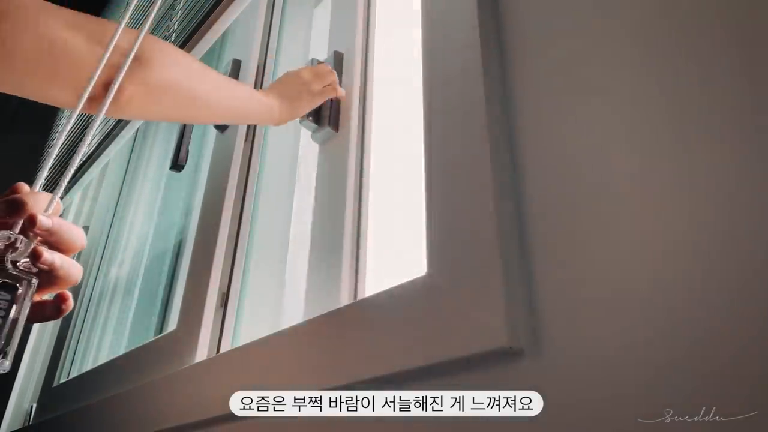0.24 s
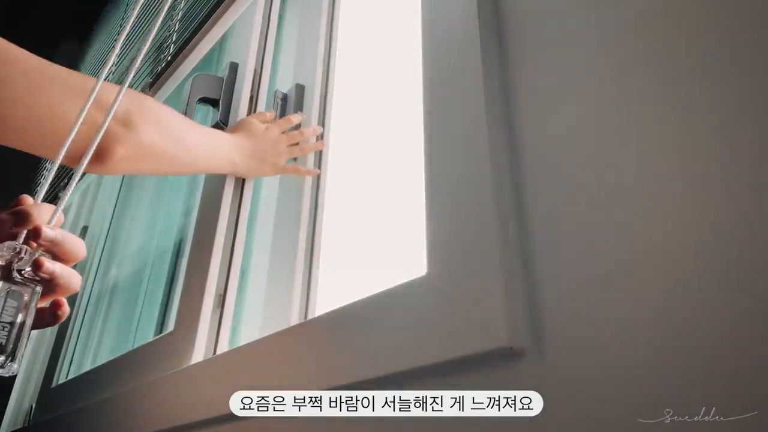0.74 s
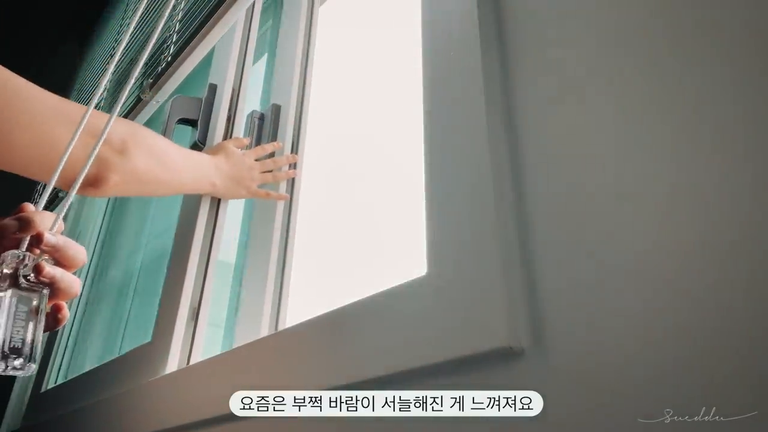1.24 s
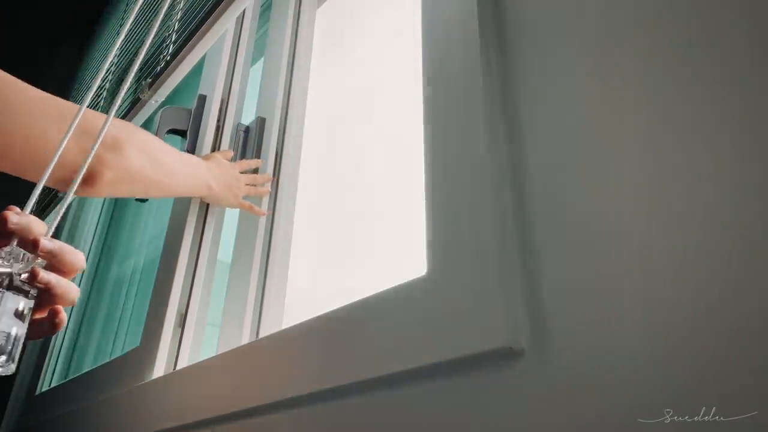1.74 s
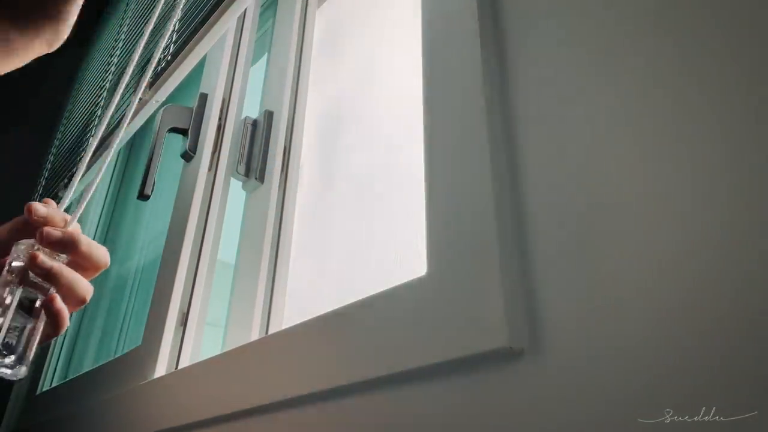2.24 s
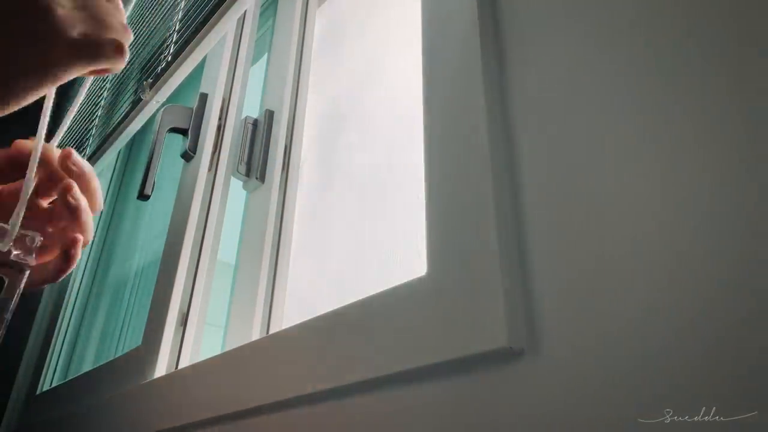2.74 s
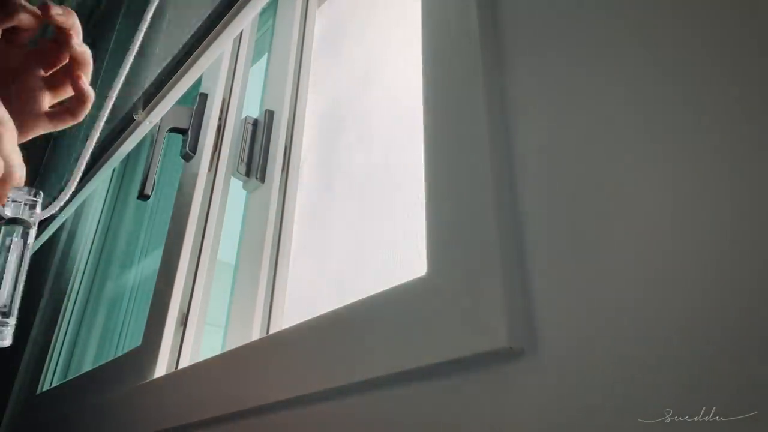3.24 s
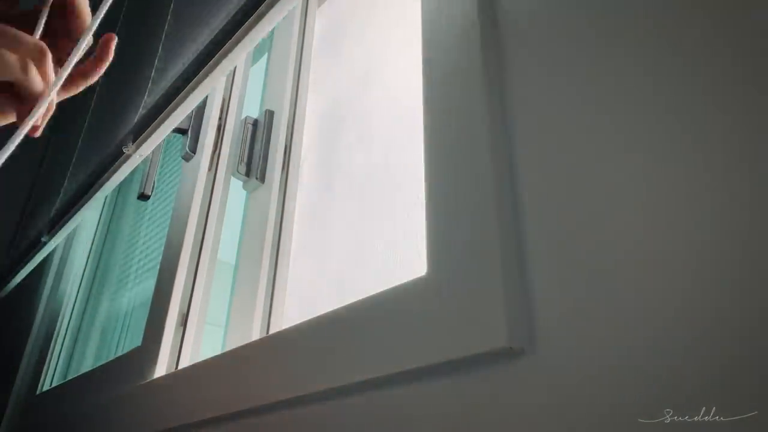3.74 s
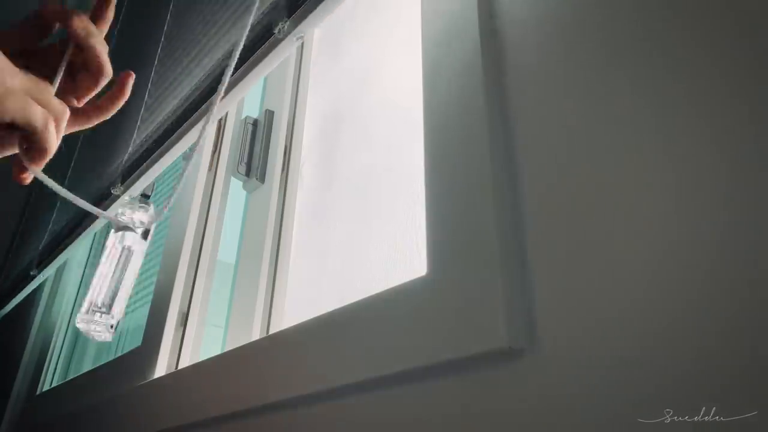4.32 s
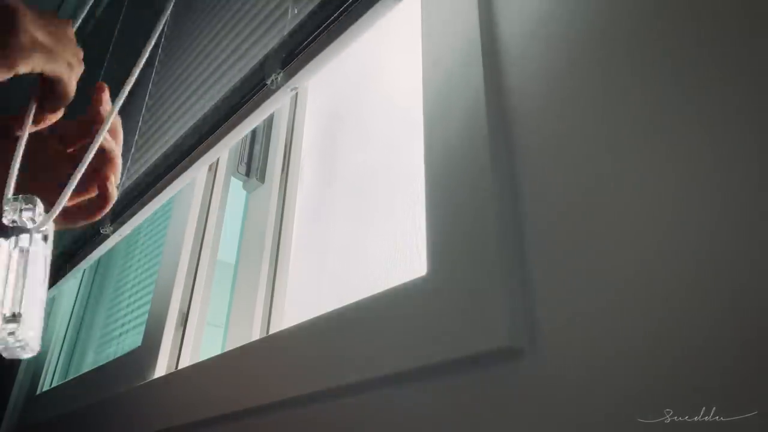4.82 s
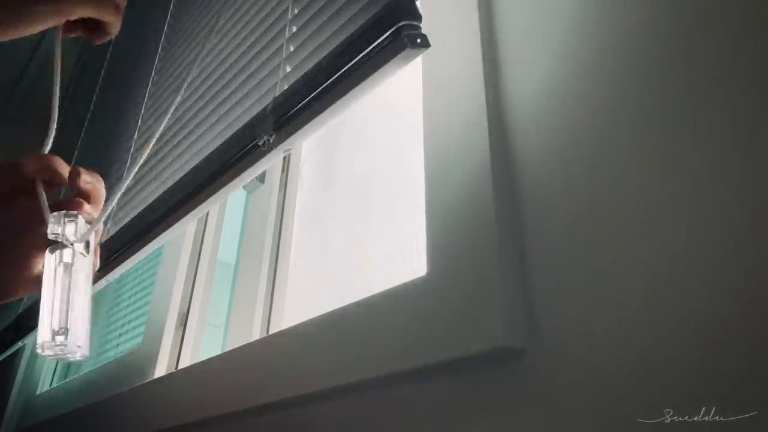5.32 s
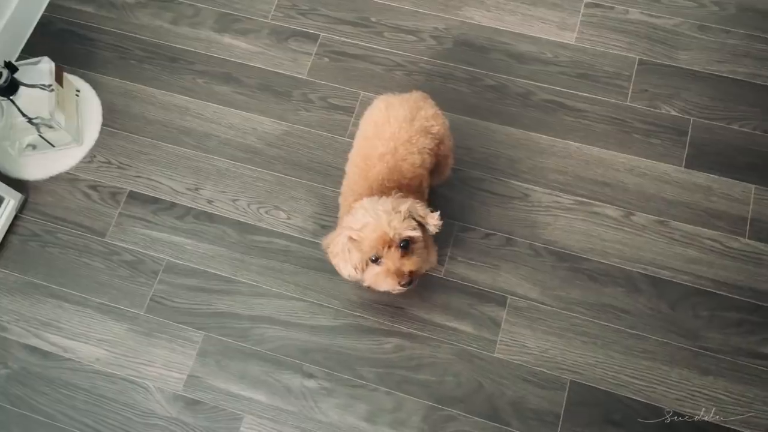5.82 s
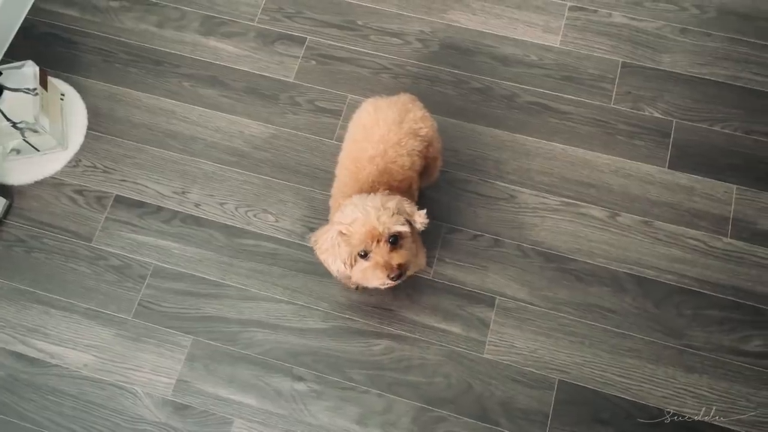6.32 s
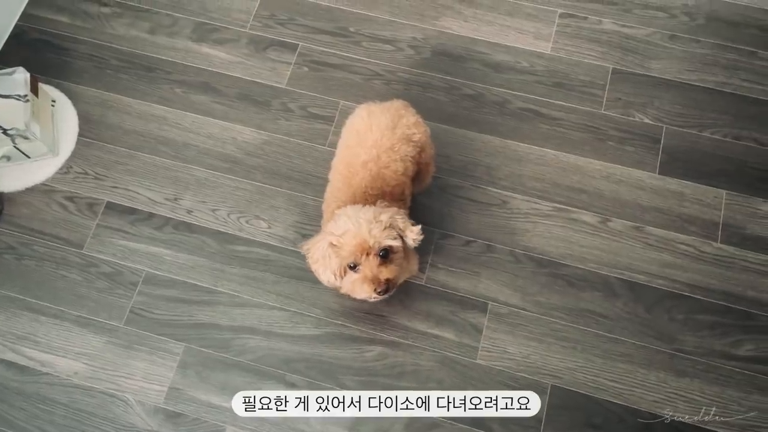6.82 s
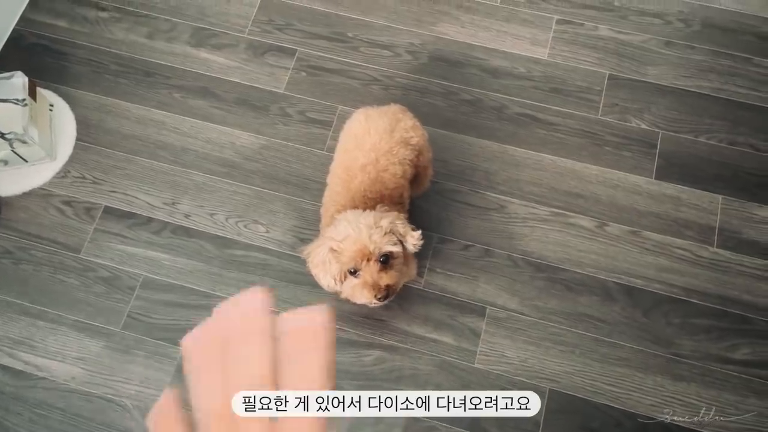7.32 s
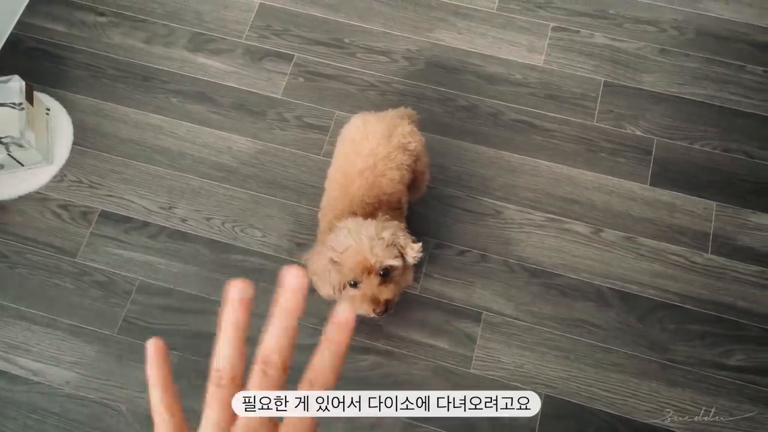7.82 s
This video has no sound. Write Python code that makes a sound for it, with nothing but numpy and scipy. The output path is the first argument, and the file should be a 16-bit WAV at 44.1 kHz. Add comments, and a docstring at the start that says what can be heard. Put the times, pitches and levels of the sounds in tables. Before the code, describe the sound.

Low street hum, a sliding window latching hard, repeated cord pulls rattling a slatted blind, then near-silence with soft rustle and tiny ticks.

```python
"""By a window over a street, a hand slides the sash along its track; the latch snaps and the frame thuds.
A slatted blind is then pulled repeatedly by its cord: cord hiss and gear rattle over a booming head rail.
A cut follows to a quiet room with a soft rustle and faint ticks. Friction is shaped random stick-slip,
impacts are noise cracks ringing resonances, and the air is drifting noise.
Two microphone ports hear the near sounds a little apart in phase."""
import sys
import numpy as np
from scipy import signal
from scipy.fft import rfft, irfft, next_fast_len
from scipy.io import wavfile
from scipy.ndimage import uniform_filter1d

SR = 44100
rng = np.random.default_rng(int(sys.argv[2]) if len(sys.argv) > 2 else 0)


def log_audio(samples):
    """Write samples as a 16-bit WAV file to the path given in sys.argv[1]."""
    # one column per channel
    frames = np.atleast_2d(samples).T
    # limit to full scale, then quantise
    limited = np.clip(frames, -1, 1)
    pcm = np.round(limited * 32767).astype(np.int16)
    wavfile.write(sys.argv[1], SR, pcm)


N = 355874

CUT_S, HANDOVER_S = 5.757, 2.58  # cut to the quiet room; the hand leaves the sash for the cord
CLOCK_S = np.arange(N) / SR
SIZE = next_fast_len(N + SR)  # leaves space for the reflections
HZ = np.fft.rfftfreq(SIZE, 1 / SR)


def amp(db):
    """Turn dB into a linear gain."""
    return 10 ** (np.asarray(db) / 20)


def evened(x):
    """Bring a sound to an RMS of one."""
    return x / np.sqrt(np.mean(x ** 2) + 1e-20)


def read(points, hz):
    """Read a curve along a logarithmic frequency axis."""
    f, value = np.transpose(points)
    return np.interp(np.log(hz + 1), np.log(f + 1), value)


def levels(rows):
    """Gains over time from the dB columns of a curve."""
    s, *columns = np.transpose(rows)
    return [amp(np.interp(CLOCK_S, s, column)) for column in columns]


def bumps(modes, hz):
    """Resonant peaks in dB over a flat response."""
    return sum(db / (1 + (2 * (hz - f) / width) ** 2) for f, width, db in modes)


def causal(db):
    """Minimum-phase impulse response for a dB gain given on an FFT grid."""
    log_gain = np.log(amp(np.maximum(db, -100)))
    full = np.concatenate([log_gain, log_gain[-2:0:-1]])
    return np.fft.ifft(np.exp(np.conj(signal.hilbert(full)))).real


def colour(x, points, modes=()):
    """Filter a sound through a spectrum and resonances, then even its level."""
    hz = np.fft.rfftfreq(16384, 1 / SR)
    response = causal(read(points, hz) + bumps(modes, hz))[:8192]
    return evened(signal.oaconvolve(x, response)[:N])


def slips(per_s, spread_db):
    """Stick-slip: random clicks of either sign, a few of them large."""
    chance = rng.random(N)
    size = rng.exponential(1, N)
    sign = rng.choice([-1, 1], N)
    return (chance < per_s / SR) * sign * amp(spread_db * np.minimum(size, 4))


def judder(hz, depth_db):
    """A gain that wobbles at random below a given rate, as under an uneven grip."""
    lowpass = signal.butter(2, hz, fs=SR, output="sos")
    wobble = signal.sosfilt(lowpass, rng.standard_normal(N))
    return amp(depth_db * evened(wobble))


def add(mix, s, sound):
    """Lay a sound into the mix at a time in seconds."""
    part = mix[round(s * SR):][:len(sound)]
    part += sound[:len(part)]


def air(points, same, phase, patchy_db):
    """Background noise with drifting patches, partly alike at both ports."""
    frames, hz = N // 512 + 5, np.fft.rfftfreq(2048, 1 / SR)
    a, b, c, d, patches = rng.standard_normal((frames, 1025, 5)).T
    patches = uniform_filter1d(patches, size=12, axis=0)  # across frequency
    patches = evened(uniform_filter1d(patches, size=6, axis=1))  # across time
    like = np.clip(read(same, hz), -1, 1)[:, None]
    lag = np.exp(-1j * read(phase, hz))[:, None]
    left = a + 1j * b
    right = like * lag * left + np.sqrt(1 - like ** 2) * (c + 1j * d)
    gain = amp(read(points, hz)[:, None] + patchy_db * patches)
    return evened(signal.istft(np.array([left, right]) * gain, nperseg=2048, noverlap=1536)[1][:, :N])


# Port spacing by the window: (frequency [Hz], left lead [rad])
PORT_PHASE = [(200, 0), (900, -.8), (1720, .3), (4900, 1.6), (5860, 3.6), (8350, 6.2), (9000, 6.36),
              (11300, 9.33), (12850, 9.52), (14600, 12.5), (16000, 12.6)]
# Port balance: (frequency [Hz], left minus right [dB])
PORT_BALANCE = [(110, 1.5), (500, -3), (1300, -1), (6500, -3), (8300, 0)]
# Reflections against direct sound, before each source's offset: (frequency [Hz], level [dB])
WET = [(130, -23), (350, 6.5), (4500, -1), (6500, 5.5), (8300, -26.5), (10000, 14), (11500, -15.5),
       (12700, -38), (13600, -15), (14800, -19)]
# Room decay: (frequency [Hz], time to fall 60 dB [s])
ROOM_T60 = [(200, 0.21), (1000, 0.22), (4000, 0.23), (12000, 0.083)]
NEAR_T60_S, LATE_DB = 0.045, -5.5  # reflections off sill and glass die first; the room follows


def ports(x, phase, wet_db=0):
    """Direct sound with the phase and balance of the port pair, plus reflections that differ per side."""
    hz, t, noise = signal.stft(rng.standard_normal((6, 2, SR // 2)), SR, nperseg=128)
    decay = amp(-60 * t / NEAR_T60_S) + amp(LATE_DB - 60 * t / read(ROOM_T60, hz)[:, None])
    tails = signal.istft(noise * decay, SR, nperseg=128)[1]
    tails = np.pad(tails, ((0, 0), (0, 0), (80, 0)))  # predelay in samples
    tails /= np.linalg.norm(tails, axis=2, keepdims=True)
    # the source moves, so the reflection pattern drifts among six
    rates_hz = np.repeat([[2.3], [3.7], [5.9]], 2, 0)
    turn = 2 * np.pi * CLOCK_S * rates_hz + np.pi / 2 * np.arange(6)[:, None]
    weights = np.cos(turn) / np.sqrt(3)
    echo = sum(rfft(x * weight, SIZE) * rfft(tail, SIZE) for weight, tail in zip(weights, tails))
    half = amp(read(PORT_BALANCE, HZ) / 2) * np.exp(.5j * read(phase, HZ))
    direct = np.array([half, 1 / half]) * rfft(x, SIZE)
    wet = amp(read(WET, HZ) + wet_db)
    return irfft((direct + wet * echo) / np.sqrt(1 + wet ** 2), SIZE)[:, :N]


# Street tone through the window, relative: (frequency [Hz], density [dB per Hz])
STREET = [(35, -1), (50, 0), (90, 2.5), (175, -12), (295, -18), (360, -21), (1040, -26), (2760, -41.5),
          (8800, -52), (16000, -73)]
# Stereo likeness of the street: (frequency [Hz], left-right likeness [0-1])
STREET_SAME = [(150, 0.96), (500, 0.36), (5500, 0.095), (8300, 0.39)]


def street():
    """Street noise through the window, low and broad, a touch louder on the left."""
    left_right_db = [[-47.2], [-48.2]]
    return amp(left_right_db) * air(STREET, STREET_SAME, PORT_PHASE, patchy_db=1.0)


# Sash moves before and after the latch: (time [s], rumble level [dB], hiss level [dB])
SLIDE = [(0.0, -38, -65.5), (0.31, -45.5, -69), (0.42, -51, -68), (0.65, -48.5, -62.5),
         (1.03, -49.5, -63.5), (1.21, -56.5, -66), (1.86, -49, -67), (2.2, -56, -70.5), (2.4, -56, -99)]
# Track rumble tone, relative: (frequency [Hz], density [dB per Hz])
SASH = [(60, -5), (140, -6), (290, -1.5), (500, -14), (1020, -20.5), (3000, -53.5), (9000, -82.5)]
# Brush seal tone, relative: (frequency [Hz], density [dB per Hz])
SEAL = [(800, -17), (1500, -1.5), (3100, -5.5), (5800, -12), (9000, -10), (16000, -20.5)]
# Rings of head rail and wall; the lowest five also colour the sash: (frequency [Hz], width [Hz], boost [dB])
RAIL = [(90, 16, 6), (196, 16, 6), (254, 16, 4), (336, 16, 5), (465, 25, 6), (592, 20, 5), (826, 50, 4),
        (1060, 35, 5), (1550, 50, 4)]


def sash():
    """Rollers rumble in the track while the brush seal hisses, both as stick-slip clicks."""
    rumble, hiss = levels(SLIDE)
    rollers = colour(slips(900, 3.34), SASH, RAIL[:5])
    brush = evened(judder(48, 1.0) * colour(slips(9000, 1.1), SEAL))
    return rumble * rollers + hiss * brush


CRACK_RISE_S, CRACK_RISE_CYCLES = 0.0014, .8  # low knocks swell more slowly
BLOW = 0.48  # the single sharp contact inside each crack, beside its grit


def cracks(rows, modes):
    """Short noise cracks, each ringing the modes of the thing that is struck."""
    out, t, hz = np.zeros(N), np.arange(8192) / SR, np.fft.rfftfreq(8192, 1 / SR)
    for s, db, centre_hz, spread, t60 in rows:
        rise = 1 - np.exp(-t / (CRACK_RISE_S + CRACK_RISE_CYCLES / centre_hz))
        crack = rng.standard_normal(len(t)) * amp(-60 * t / max(t60, .005)) * rise
        crack[round(CRACK_RISE_S * SR)] += BLOW * np.linalg.norm(crack)
        octaves = np.log2(np.maximum(hz, 20) / centre_hz)
        ring = causal(bumps(modes, hz) - 6 * (octaves / spread) ** 2)
        knock = signal.fftconvolve(crack, ring[:2048])[:len(t)]
        add(out, s, amp(db) * knock / abs(knock).max())
    return out


# Latch and sash knocks: (time [s], peak level [dB], centre [Hz], spread [octaves], time to fall 60 dB [s])
KNOCKS = [(0.615, -60, 2480, 1.2, 0.034), (.626, -43.5, 1860, 0.46, 0.08), (.640, -38.5, 1900, 0.68, 0.061),
          (0.697, -50, 1540, 0.61, 0.054), (1.673, -49, 2520, 1.2, 0.021),
          (1.6855, -36.5, 2540, 0.66, 0.0093), (1.708, -36, 607, 0.93, 0.18),
          (1.706, -45, 3100, 0.57, 0.0095), (1.716, -31.5, 1800, 0.93, 0.09),
          (1.7205, -30, 2500, 1.8, 0.061), (1.7262, -16.5, 3500, 1.08, 0.011),
          (1.735, -23.5, 600, 0.9, 0.24), (1.7395, -20.5, 1150, 0.87, 0.016), (1.768, -26, 398, 0.7, 0.06)]
# Latch rings: (frequency [Hz], width [Hz], boost [dB])
LATCH = [(1380, 83, 6), (1660, 320, 2.5), (3150, 400, 9.5), (4800, 450, 8), (9150, 310, -0.5)]


def latch_knocks():
    """Latch and sash crack against each other, ringing the latch metal."""
    return cracks(KNOCKS, LATCH)


# Frame modes: (frequency [Hz], width [Hz], level before the onset fade [dB])
FRAME = [(62.6, 6.1, -33), (98, 6.1, -26.5), (170, 44, -13), (195.4, 8.5, -30), (289, 30, -23),
         (450, 16, -31.5)]


def frame_thud():
    """The frame answers the closing blow with a slower thud of decaying sines."""
    out, t = np.zeros(N), np.arange(SR // 2) / SR
    thud = 0
    for db, width, f in [(db, width, f) for f, width, db in FRAME]:
        thud = thud + amp(db) * np.exp(-np.pi * width * t) * np.sin(2 * np.pi * (f * t + rng.random()))
    add(out, 1.735, thud * (1 - np.exp(-t / .01)))  # the sash meets the frame
    return out


# Pulls on the cord, hand over hand; levels are before swell and sag: (full speed before lag [s], hold [s],
# swell before each layer's share [dB], start briskness [factor], stop briskness [factor],
# rail boom level [dB], gear rattle level [dB], cord hiss level [dB], rail hum level [dB])
PULLS = [(2.798, 0.21, -1.5, 0.78, 1.4, -40, -46, -56, -38),
         (3.114, 0.0061, -3.5, 0.98, 2, -47, -61, -68.5, -59),
         (3.336, .12, -2.5, 0.87, 1.2, -45, -47, -55, -46.5),
         (3.665, 0.12, 3, 0.74, 0.59, -40, -38.5, -49.5, -39.5),
         (3.9, 0.14, 6.5, 0.71, 0.83, -40, -40, -50, -54),
         (4.22, 0.18, 9, 0.99, 0.87, -34.5, -34.5, -47, -39),
         (4.501, 0.18, 1.5, 0.53, 0.66, -40.5, -45.5, -54.5, -40.5),
         (4.83, 0.11, 8, 0.53, 0.34, -36, -37.5, -48, -41.5),
         (5.12, 0.14, 7, 0.32, 0.73, -42.5, -44, -52.5, -46),
         (5.429, 0.11, 6.5, 0.74, 0.27, -39.5, -38.5, -48.5, -42.5),
         (5.71, 0.076, 7.5, 0.51, .9, -42.5, -46.5, -53.5, -55)]
# how each layer answers a pull, in the order boom, rattle, hiss, hum
RISE_DB_PER_S, FALL_DB_PER_S = (149, 131, 133, 160), (107, 150, 144, 120)  # before briskness and steepening
SWELL_SHARE = (0.48, 1, 1.0, 0.18)  # part of the swell taken
ARCH_DB = (1.5, 2.35, 0.93, 7.4)  # sag towards both ends of the hold
REST_DB = (-54, -64, -99, -56.5)  # the blind still sways between pulls
LAG_S = (0.02, 0.0046, 0.001, 0.039)  # rail and gears take up the pull after the cord
STEEPEN_S = 0.1  # the further from the hold, the faster the sound drops away


def pulled(layer):
    """Gain of one layer: each pull rises, holds with a swell, and falls; their powers add."""
    t = np.arange(0, N / SR, .001)
    power = amp(REST_DB[layer]) ** 2
    for s, held, swell_db, start, stop, *top_db in PULLS:
        s = s + min(LAG_S[layer], held / 2)
        u = np.clip((t - s) / held, 0, 1)  # progress through the hold
        db = top_db[layer] - SWELL_SHARE[layer] * swell_db * (1 - u) - ARCH_DB[layer] * (2 * u - 1) ** 2
        early, late = np.maximum(s - t, 0), np.maximum(t - s - held, 0)
        db = db - start * RISE_DB_PER_S[layer] * early * (1 + early / STEEPEN_S)
        db = db - stop * FALL_DB_PER_S[layer] * late * (1 + late / STEEPEN_S)
        power = power + amp(db) ** 2
    return np.interp(CLOCK_S, t, np.sqrt(power))


# Rail boom tone, relative: (frequency [Hz], density [dB per Hz])
BOOM = [(40, 0), (100, -2.5), (150, 2.5), (300, 1.5), (500, -15.5), (3000, -80.5)]
# Gear rattle tone, relative: (frequency [Hz], density [dB per Hz])
RATTLE = [(200, -24.5), (420, -2.5), (800, -9.5), (1000, -12), (2050, -14.5), (2350, -33.5), (6000, -74)]
# Cord hiss tone, relative: (frequency [Hz], density [dB per Hz])
CORD = [(1200, -23), (2400, -4), (6000, -8.5), (9000, -6.5), (16000, -14)]
HUM_HZ, HUM_WANDER_DB = 196, 0.4  # pitch of one rail ring; its random stray as a frequency ratio in dB


def blind():
    """The cord slips over its pulley, gears rattle, the head rail booms and hums."""
    boom, rattle, hiss, hum = map(pulled, range(4))
    grip = evened(judder(37.6, 0.97))  # shared by rattle and hiss
    pitch_hz = HUM_HZ * judder(44.0, HUM_WANDER_DB)
    tone = np.sin(2 * np.pi * np.cumsum(pitch_hz) / SR) * evened(judder(3.2, 0.57))
    rail = colour(slips(1000, 3.0), BOOM, RAIL)
    gears = colour(slips(1100, 2.55), RATTLE, RAIL)
    cord = colour(slips(12000, 0.81), CORD)
    return boom * rail + hum * evened(tone) + rattle * grip * gears + hiss * grip * cord


SLATS_DB = -5.5  # slat taps beside the gear rattle
SLAT_LOW_HZ, SLAT_HIGH_HZ, SLAT_CYCLES = 408.8, 2133, 12  # range of pitches, length of ring


def slat_taps(count=20):
    """Slats tap each other as the gears rattle, each with a short ring of its own pitch."""
    taps, which, out = slips(220, 2.55), rng.integers(0, count, N), np.zeros(N)
    for k, hz in enumerate(np.geomspace(SLAT_LOW_HZ, SLAT_HIGH_HZ, count)):
        turns = np.arange(2048) * hz / SR
        ring = turns * np.exp(-4 * turns / SLAT_CYCLES) * np.sin(2 * np.pi * turns)
        out += signal.oaconvolve(taps * (which == k), ring / np.sqrt(hz))[:N]
    return amp(SLATS_DB) * pulled(1) * (CLOCK_S > HANDOVER_S) * evened(out)


# The blind catches and clacks: (time [s], peak level [dB], centre [Hz], spread [octaves],
# time to fall 60 dB [s])
CLACKS = [(2.674, -54, 980, 0.54, 0.019), (2.806, -26.5, 980, 1.05, 0.054), (2.823, -28, 302, 1.34, 0.17),
          (3.68, -29.5, 870, 0.79, 0.34), (3.91, -39, 2550, 0.84, 0.037), (3.995, -40, 4770, 0.32, .08),
          (4.316, -27.5, 820, 0.2, 0.016), (4.43, -34, 1550, 0.33, 0.03), (4.848, -38.5, 885, 0.92, 0.1),
          (5.099, -38, 7500, 1.1, 0.0084), (5.1, -48.5, 3120, .2, 0.02), (5.607, -26.5, 8400, 0.77, 0.018),
          (5.608, -38, 4950, 0.15, .03)]
# Plastic grip on the cord: (frequency [Hz], width [Hz], boost [dB])
GRIP = [(3120, 61, 9), (4950, 65, 9)]


def blind_clacks():
    """The blind catches and clacks, ringing the head rail and the cord's grip."""
    return cracks(CLACKS, RAIL + GRIP)


# Quiet room tone, relative: (frequency [Hz], density [dB per Hz])
QUIET = [(35, -4.5), (55, -2), (80, -16.5), (250, -17), (770, -36), (2600, -54), (4000, -52), (4900, -44.5),
         (5500, -49), (7000, -46), (8500, -59.5), (11500, -68)]
# Stereo likeness of the quiet room: (frequency [Hz], left-right likeness [0-1])
QUIET_SAME = [(150, 0.86), (500, 0.26), (3500, 0.071), (5000, 0.44), (7500, 0.9)]
# Port spacing in the quiet room: (frequency [Hz], left lead [rad])
QUIET_PHASE = [(5000, 0), (7300, -3.14), (8600, -4.1), (10000, -6.2), (16000, -6.3)]


def room_tone():
    """The quiet room's air, a low patchy noise bed."""
    return amp(-54) * air(QUIET, QUIET_SAME, QUIET_PHASE, patchy_db=2.4)


# A soft rustle: (time [s], level [dB])
RUSTLE = [(5.79, -55), (5.92, -62), (6.16, -59), (6.5, -71.5), (7.07, -87), (7.24, -66), (7.85, -88),
          (7.96, -64.5), (8.05, -57.5)]
# Rustle tone, relative: (frequency [Hz], density [dB per Hz])
CLOTH = [(300, 20), (800, 7.5), (2700, -6.5), (6500, -26.5)]


def rustle():
    """Cloth rustles softly: stick-slip clicks with a dark colour."""
    return levels(RUSTLE)[0] * colour(slips(1500, 2.2), CLOTH)


# Faint ticks, one row per band that rings: (time [s], level before onset fade and decay [dB],
# centre [Hz], time to fall 60 dB [s])
TICKS = [(5.929, -66.5, 9450, .15), (5.944, -73, 10840, .15), (5.977, -69, 10300, 0.17),
         (6.028, -78, 2530, 1.1), (6.12, -75, 11300, .16), (6.148, -61.5, 2700, 0.044),
         (6.147, -58, 6640, 0.06), (6.148, -67, 9600, .24), (6.169, -65, 3460, 0.035),
         (6.179, -64, 6300, 0.089), (6.18, -66, 2800, .04), (6.194, -70, 2500, .08),
         (6.395, -78, 9100, .29), (6.583, -74, 2850, 0.11), (6.68, -71.5, 3370, 0.059),
         (7.955, -77, 9200, 1), (8.029, -65.5, 2900, .04)]
TICK_WIDTH = 0.18  # bandwidth as a share of the centre


def ticks():
    """Small dull or bright taps, each a dying puff of band noise."""
    out, t, hz = np.zeros(N), np.arange(8192) / SR, np.fft.rfftfreq(8192, 1 / SR)
    onset = 1 - np.exp(-t / 0.00051)
    for s, db, f, t60 in TICKS:
        band_shape = np.exp(-((hz / f - 1) / TICK_WIDTH) ** 2)
        band = irfft(rfft(rng.standard_normal(len(t))) * band_shape)
        add(out, s, amp(db) * evened(band) * amp(-60 * t / t60) * onset)
    return out


def scene():
    """Window and blind over the street, then a cut to the quiet room."""
    before = np.clip((CUT_S - CLOCK_S) / .004, 0, 1)
    handover = np.clip((CLOCK_S - HANDOVER_S) / .04, 0, 1)
    rubbing = (1 - handover) * sash() + handover * blind()
    impacts = latch_knocks() + frame_thud() + slat_taps() + blind_clacks()
    window = street() + ports(rubbing, PORT_PHASE) + ports(impacts, PORT_PHASE, wet_db=-5.5)
    room = room_tone() + ports(rustle() + ticks(), QUIET_PHASE, wet_db=-1.5)
    return before * window + (1 - before) * room * amp([[-.6], [.6]])  # the room leans right


def record(dry):
    """A steep rumble filter, then the band limit of the recorder."""
    rumble_cut = signal.butter(14, 39, "high", fs=SR, output="sos")
    firm = signal.sosfilt(rumble_cut, dry)
    band_limit = signal.firwin(511, 15800, window=("kaiser", 9), fs=SR)
    return signal.oaconvolve(firm, band_limit[None], "same")


dry = scene()
out = record(dry)
log_audio(out)
```